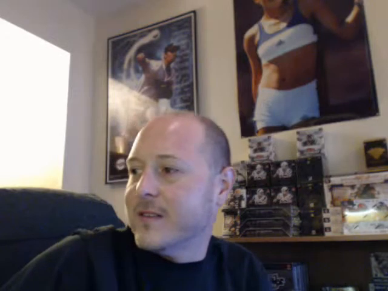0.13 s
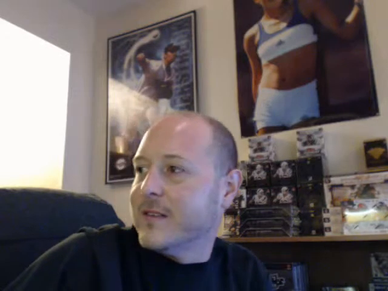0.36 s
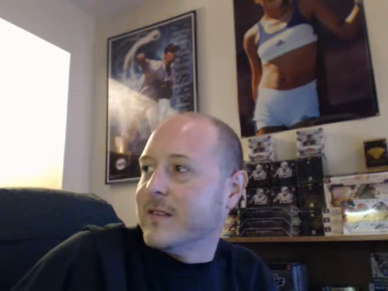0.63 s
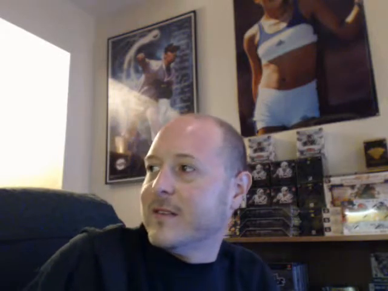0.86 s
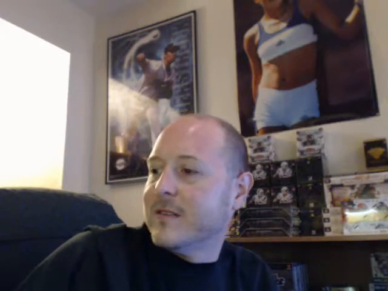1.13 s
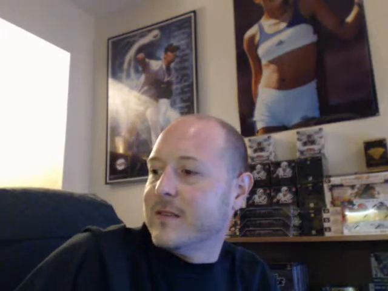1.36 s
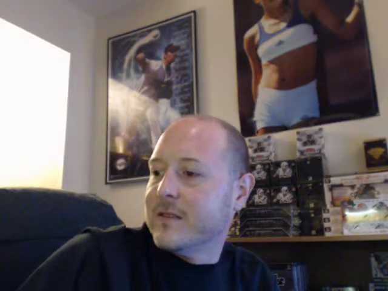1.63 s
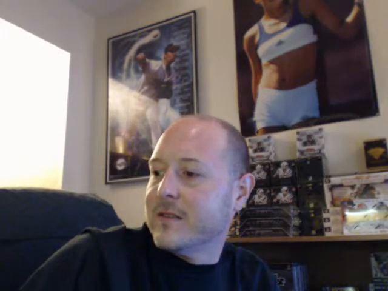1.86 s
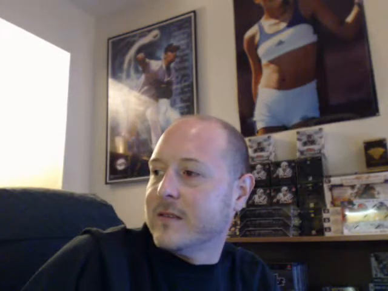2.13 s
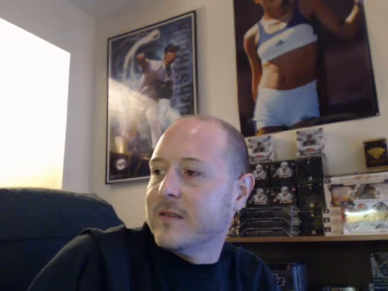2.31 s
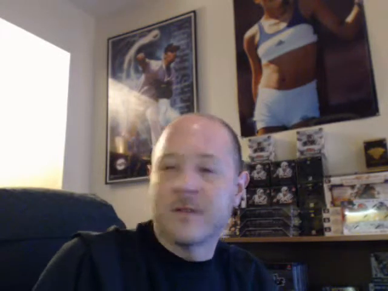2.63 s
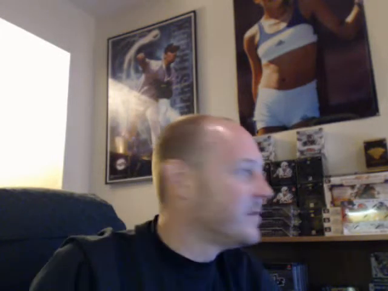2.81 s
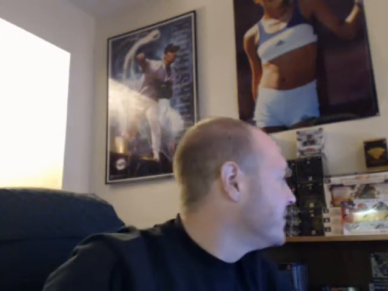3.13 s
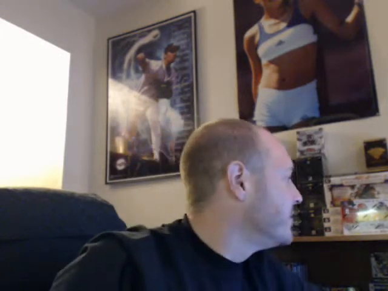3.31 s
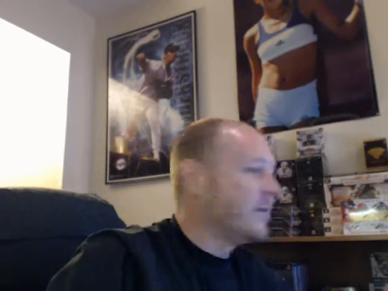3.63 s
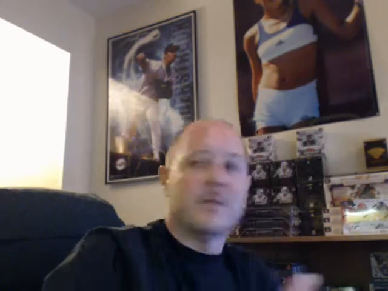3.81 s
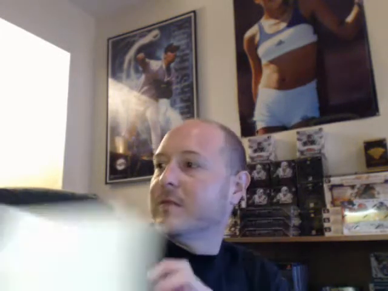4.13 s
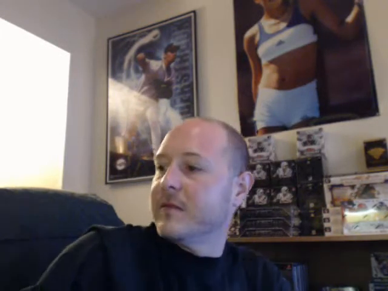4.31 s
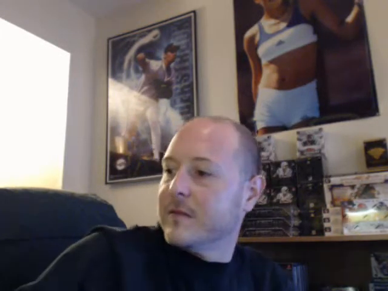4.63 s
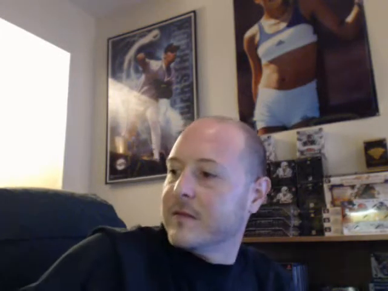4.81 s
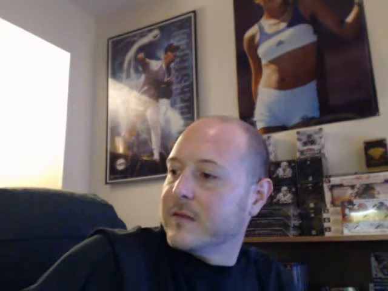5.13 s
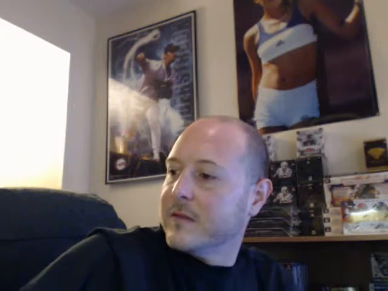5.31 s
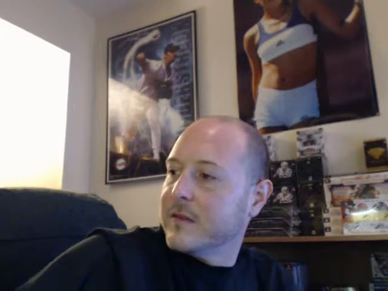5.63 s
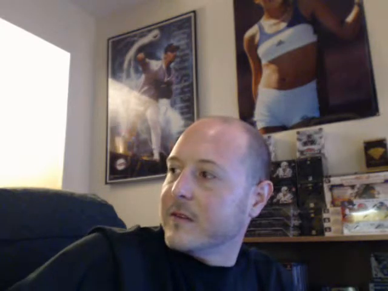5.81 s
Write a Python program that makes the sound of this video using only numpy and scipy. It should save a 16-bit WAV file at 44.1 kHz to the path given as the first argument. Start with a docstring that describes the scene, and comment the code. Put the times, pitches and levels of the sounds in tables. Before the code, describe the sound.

A small, fairly dry indoor room has a quiet low rumble, faint hiss and a barely audible thin fan tone. From 0 to about 2.1 s, a sheet of paper is pushed in eight very short rasping strokes, roughly every 0.3 s, each with a gripping squeak and a small snap; light desk taps fall between them. At 2.3 s the strokes merge into a longer scratchy slide lasting until about 2.8 s. A lull follows, with a soft bump or so. Around 3.35 s the paper is picked up with a click, rustle and swish; it flexes most loudly from 3.8 to 4.25 s, crackling, with a low papery boom near 4.0. Finer slips through the fingers follow at 4.4-4.7 s. A sharp, strong click with a low thump comes at 4.85 s, then light taps near 5.3, 5.5 and 5.85 s. A webcam microphone dulls the top and the deep bass.

```python
"""A sheet of paper is pushed along a desk in eight short strokes and one long slide, as by a paper feed:
frictional noise, with a squeak as each push grips and a snap as it lets go. Picked up, the sheet flexes
in crackles, scrapes and slides through the fingers as filtered slips, booms and is swung aside.
Light taps ring the desk, clicks are coloured pulses and soft low bumps are short damped swings.
A small room with a low rumble surrounds them, heard through a webcam microphone."""
import sys
import numpy as np
from scipy import signal
from scipy.fft import rfft, irfft, next_fast_len
from scipy.io import wavfile
from scipy.ndimage import uniform_filter1d, map_coordinates

SR = 44100
rng = np.random.default_rng(int(sys.argv[2]) if len(sys.argv) > 2 else 0)


def bounce(signal):
    """Save signal as a 16-bit WAV file at the path given by the first command-line argument."""
    frames = np.transpose(np.atleast_2d(signal))
    limited = np.clip(frames, -1, 1)
    pcm = np.round(limited * 32767).astype(np.int16)
    wavfile.write(sys.argv[1], SR, pcm)


N = 262703
T = np.arange(N) / SR  # time [s]
TOP_HZ = 8300  # upper limit of the microphone


def undb(db):
    """Logarithmic level: decibels to amplitude gain."""
    return 10 ** (np.asarray(db) / 20)


def unit(x):
    """Power normalisation: scale to rms 1."""
    return x / np.sqrt(np.mean(x ** 2))


def curve(hz, points):
    """Spectral envelope: join (frequency [Hz], level [dB]) points on a log-frequency axis."""
    f, db = np.transpose(points)
    return np.interp(np.log(hz), np.log(f), db)


def colour(x, response):
    """Minimum-phase filtering: a causal filter whose gain in dB is response(Hz)."""
    size = 2 * next_fast_len(len(x))
    hz = np.maximum(np.arange(size // 2 + 1) * SR / size, 1)
    cepstrum = irfft(np.log(undb(response(hz))))
    # folding the cepstrum onto positive time makes the filter causal
    cepstrum[1:size // 2] *= 2
    cepstrum[size // 2 + 1:] = 0
    gain = np.exp(rfft(cepstrum))
    return irfft(rfft(x, size) * gain)[:len(x)]


def below(hz, edge_hz):
    """Shelving weight: 1 well below the edge, 0 well above it."""
    return 1 / (1 + ((hz / edge_hz) ** 2) ** 2)


def resonance(offset, width):
    """Lorentzian resonance: 1 at zero offset, one half at half the width to either side."""
    return 1 / (1 + (2 * offset / width) ** 2)


def held(age, attack_s, hold_s, release_s):
    """Envelope: a straight rise, held until hold_s after the start, then an exponential fall."""
    return np.clip(age / attack_s, 0, 1) * np.exp(-np.maximum(age - hold_s, 0) / release_s)


def noise_burst(t, decay_s):
    """Impact excitation: noise with a rounded start and an exponential decay."""
    return rng.standard_normal(len(t)) * (np.exp(-t / decay_s) - np.exp(-5 * t / decay_s))


def add(out, start, x):
    """Superposition: mix x into out from a start time in seconds."""
    i = int(start * SR)
    x, i = x[max(-i, 0):], max(i, 0)
    out[i:i + len(x)] += x[:len(out) - i]


def fibres(size, rate, spread_db):
    """Stick-slip friction: random tiny slips, rate per second, of widely scattered strength."""
    slips = rng.random(size) < rate / SR
    strength_db = spread_db * np.minimum(rng.exponential(size=size), 4)
    return unit(slips * rng.standard_normal(size) * undb(strength_db))


def blow(x, db):
    """Impulse energy: scale a short sound so that its energy spread over 10 ms has the level db."""
    return x * undb(db) / np.sqrt(np.sum(x ** 2) / (SR / 100))


# pushes of the sheet: (start [s], length [s], hiss level [dB], body level relative to hiss [dB])
PUSHES = [(-.02, 0.044, -40, -8), (0.231, 0.057, -39.5, 3.5), (.524, .055, -39, 2), (.82, 0.061, -38, 1.5),
          (1.114, 0.065, -37, -2), (1.414, 0.063, -35, -7.5), (1.694, .06, -35.5, -3.5),
          (1.988, 0.061, -36.5, -2), (2.302, .17, -37, -0.5), (2.492, .28, -37.5, 1)]
# spectrum of the rubbing: (frequency [Hz], level [dB])
RUB_SPECTRUM = [(71, -29.5), (120, -26.5), (266, -14), (422, -4.5), (580, 0.5), (704, -6.5), (856, 3),
                (968, -2.5), (1060, 6.5), (1240, -5), (1770, -3), (3340, -14.5), (4510, -15.5),
                (7410, -22.5), (8240, -33.5), (10700, -78), (18100, -120)]
# resonances of the surface under the sheet: (frequency [Hz], width [Hz], height [dB])
SURFACE_MODES = [(438, 17, 6.5), (578, 35, 5.5), (713, 30, 2), (774, 99, 0.5), (970, 60, -0.5),
                 (1030, 73, 1), (1155, 360, -3.5), (1360, 16, 4.5), (1610, 28, 2.5), (1840, 7.6, 0),
                 (2272, 50, 5.5), (4700, 600, 5.5)]


def strokes(build_s=0.014, attack_s=0.004, stop_s=0.014):
    """Sliding friction: each push hisses at once and its low body joins as it gathers speed."""
    def response(hz):
        modes = sum(db * resonance(hz - f, width) for f, width, db in SURFACE_MODES)
        return curve(hz, RUB_SPECTRUM) + modes
    rub = unit(colour(fibres(N, rate=14000, spread_db=1.7), response))
    low_pass = signal.butter(2, 1300, fs=SR, output="sos")
    body = signal.sosfiltfilt(low_pass, rub)
    hiss = rub - body
    out = np.zeros(N)
    for start, length, db, body_db in PUSHES:
        age = np.maximum(T - start, 0)
        gate = held(age, attack_s, length, stop_s)
        speed = 1 - np.exp(-(age / build_s) ** 2)
        out += undb(db) * gate * (hiss + undb(body_db) * speed * body)
    return out


# spectrum of the gripping squeak: (frequency [Hz], level [dB])
GRIP_SPECTRUM = [(200, -28.5), (900, -13.5), (1070, -1), (1300, -3.5), (1900, -5), (2230, 7), (2750, -20),
                 (3500, -6.5), (4500, 1.5), (5500, -22.5), (8500, -36.5)]
GRIP_S, GRIP_DB, GRIP_BASS_DB = 0.0075, -4.5, -4.5  # decay, level relative to the push, bass shelf


def grips():
    """Static friction breaking: a brief squeak of coloured noise as each push catches the sheet."""
    def response(hz):
        return curve(hz, GRIP_SPECTRUM) + GRIP_BASS_DB * below(hz, edge_hz=1500)
    out, t = np.zeros(N), T[:SR // 10]
    for start, _, db, _ in PUSHES:
        squeak = colour(noise_burst(t, GRIP_S), response)
        add(out, start, blow(squeak, db + GRIP_DB))
    return out


# spectrum of the room rumble and hiss: (frequency [Hz], level [dB])
RUMBLE_SPECTRUM = [(18, -65.5), (30, -30), (93, 0.5), (183, 1), (345, -15.5), (540, -15.5), (651, -27.5),
                   (864, -19.5), (1200, -27), (1350, -32), (1450, -23.5), (2490, -24.5), (3000, -32),
                   (6070, -34.5), (8240, -51), (10700, -89), (18100, -120)]
RUMBLE_DB = -61


def floor(whine_hz=1360, whine_db=-83):
    """Stationary background noise: low rumble and faint hiss, with the thin pure tone of a fan."""
    air = unit(colour(rng.standard_normal(N), lambda hz: curve(hz, RUMBLE_SPECTRUM)))
    whine = unit(np.sin(2 * np.pi * whine_hz * T))
    return undb(RUMBLE_DB) * air + undb(whine_db) * whine


# lone crisp clicks: (time [s], level [dB], bass shelf [dB])
CLICKS = [(1.436, -33, -13.5), (3.371, -39, -27.5), (3.927, -38.5, 29), (4.146, -35, 3.5),
          (4.854, -24.5, -3.5), (5.2785, -60, -18), (5.503, -66, -6)]
# spectrum of a click: (frequency [Hz], level [dB])
CLICK_SPECTRUM = [(90, -13), (140, -9.5), (700, -3.5), (1400, -6), (2100, -5), (3400, -12), (4100, -2),
                  (4550, -2), (5100, -8), (5800, -24.5), (6500, -17.5), (7400, -40), (8500, -39.5)]
# snap before the end of each push: lead time [s], level relative to the push [dB], bass shelf [dB]
LET_GO_S, LET_GO_DB, LET_GO_BASS_DB = 0.011, -5.5, 1.5


def snaps(crack_s=0.0029, crack_db=-19):
    """Impulsive release: one sharp pulse with a brief crackle, alone or near the end of a push."""
    out, t = np.zeros(N), T[:SR // 10]
    releases = [(start + length - LET_GO_S, db + LET_GO_DB, LET_GO_BASS_DB)
                for start, length, db, _ in PUSHES]
    for start, db, bass_db in CLICKS + releases:
        def response(hz):
            return curve(hz, CLICK_SPECTRUM) + bass_db * below(hz, edge_hz=2100)
        crackle = undb(crack_db) * rng.standard_normal(len(t)) * np.exp(-t / crack_s)
        pulse = t == 0
        add(out, start, blow(colour(pulse + crackle, response), db))
    return out


# light taps on the desk: (time [s], level [dB], upper edge [Hz], contact time constant [s])
DESK_TAPS = [(.028, -39, 3100, 0.0076), (.189, -42, 2850, 0.012), (0.339, -45, 3350, 0.0072),
             (0.476, -32.5, 2540, 0.0071), (.615, -52.5, 1490, 0.0061), (1.324, -55.5, 1600, 0.0069),
             (1.597, -47.5, 2190, 0.013), (1.798, -40.5, 1490, 0.0027), (5.062, -56.5, 1300, 0.011),
             (5.278, -33.5, 1900, 0.0024), (5.501, -40, 1750, .005), (5.52, -41.5, 850, 0.01),
             (5.715, -53.5, 1300, 0.0094), (5.851, -40, 2640, 0.0051), (5.868, -38.5, 2900, 0.0062)]
# modes of the desk: (nominal frequency [Hz], level [dB], t60 before damping [s])
DESK_MODES = [(345, -4, .13), (455, -5, .11), (525, -1, .11), (730, -4, .08), (920, -2, .08),
              (1080, 1, .07), (1510, -5, .05), (2300, -9, .05)]
DESK_RING_DB, DESK_DAMPING = -4, 2.4  # ring relative to knock; a resting hand shortens t60 this many times
KNOCK_HZ, KNOCK_WIDTH_HZ, KNOCK_DB = 860, 360, 1.5  # hollow body of every tap


def desk_ring(t):
    """Modal decay: damped sines, each slightly detuned at random."""
    ring = np.zeros(len(t))
    for hz, db, t60 in DESK_MODES:
        detuned_hz = hz * (1 + 0.011 * rng.standard_normal())
        decay = np.exp(-np.log(1000) * DESK_DAMPING * t / t60)
        ring += undb(db) * decay * np.sin(2 * np.pi * detuned_hz * t)
    return ring


def taps(dull_db=-29, thin_db=-16, top_db=-26, tick_db=8):
    """Impact and modal response: a tick and scuff knock the desk; longer contact rounds the scuff's start."""
    out, t = np.zeros(N), T[:SR // 4]
    for start, db, edge_hz, contact in DESK_TAPS:
        def response(hz):
            hollow = KNOCK_DB * resonance(hz - KNOCK_HZ, KNOCK_WIDTH_HZ)
            dull = dull_db * (1 - below(hz, edge_hz))
            thin = thin_db * below(hz, edge_hz=350)
            return hollow + dull + thin + top_db * (hz / TOP_HZ).clip(0, 2)
        push = undb(tick_db) * (t == 0) + noise_burst(t, contact)
        knock = blow(colour(push, response), 0)
        desk = blow(signal.fftconvolve(knock, desk_ring(t))[:len(t)], DESK_RING_DB)
        add(out, start, blow(knock + desk, db))
    return out


# the clearest soft low bumps: (time [s], level [dB])
CLEAR_BUMPS = [(0.35, -45.5), (0.669, -49), (.917, -44), (1.025, -49), (1.525, -45), (2.063, -46),
               (3.144, -43.5), (3.343, -46), (3.56, -40), (3.603, -40), (3.937, -41.5), (3.999, -37),
               (4.31, -48), (4.344, -49), (4.848, -36), (5.015, -42), (5.192, -51), (5.279, -44.5),
               (5.675, -48)]
BUMP_HZ, BUMP_S = 124.8, 0.021  # mean main frequency; twice the time to the peak
# fainter bumps come at random while the sheet is in the hand, from begin [s] to end [s]
HANDLING_S, FIDGETS_PER_S, FIDGET_DB, FIDGET_SPREAD_DB = (3.4, 5.1), 7.1, -51, 1


def bumps():
    """Damped oscillation: soft contacts move the furniture for a few slow cycles; handling adds more."""
    out, t = np.zeros(N), T[:SR // 4]
    age = t / (BUMP_S / 2)
    envelope = (age * np.exp(1 - age)) ** 2
    begin, end = HANDLING_S
    fidgets = [(begin + (k + rng.random()) / FIDGETS_PER_S, FIDGET_DB + FIDGET_SPREAD_DB * rng.standard_normal())
               for k in range(int((end - begin) * FIDGETS_PER_S))]
    for start, db in CLEAR_BUMPS + fidgets:
        chance = rng.standard_normal(3)
        hz = BUMP_HZ * (1 + 0.11 * chance[0])
        swing = np.sin(2 * np.pi * hz * t)
        swing += 0.49 * np.sin(2 * np.pi * 172 * t + chance[1])
        swing += 0.13 * np.sin(2 * np.pi * 104 * t + chance[2])
        add(out, start, undb(db) * unit(swing) * envelope)
    return out


# swipes of paper through the fingers: (start [s], length [s], starting level [dB], swell or fade [dB/s])
FINGER_SWIPES = [(1.189, 0.1, -62.5, -64), (3.336, .125, -51.5, -76), (3.474, .28, -54.5, -14),
                 (3.774, 0.23, -60, 37), (4.059, 0.044, -70, 82), (4.102, 0.11, -53.5, -31),
                 (4.448, 0.097, -49, -85), (4.552, .24, -48.5, -89), (5.032, 0.23, -81.5, 41),
                 (5.334, 0.027, -61.5, -25), (5.61, .07, -77, 9)]
# spectrum of the fine hiss: (frequency [Hz], level [dB])
HISS_SPECTRUM = [(600, 1), (1800, 0.5), (3000, -9), (4500, 11.5), (5500, 7), (6500, 8), (7500, -1),
                 (8500, -16)]
SWIPE_ATTACK_S, SWIPE_RELEASE_S = 0.014, 0.0044


def slide():
    """Speed-dependent friction: paper hisses over skin and paper as each swipe speeds up or slows down."""
    speed, t = np.zeros(N), T[:SR // 2]
    for start, length, db, db_per_s in FINGER_SWIPES:
        swell = undb(db + db_per_s * np.minimum(t, length))
        add(speed, start, swell * held(t, SWIPE_ATTACK_S, length, SWIPE_RELEASE_S))
    hiss = unit(colour(fibres(N, rate=3200, spread_db=1.0), lambda hz: curve(hz, HISS_SPECTRUM)))
    return speed * hiss


# scrapes of an edge between bends: (start [s], length [s], level [dB], resonance at mid-scrape [Hz])
EDGE_SCRAPES = [(3.344, 0.059, -51, 1300), (3.385, 0.081, -47, 2080), (3.518, 0.062, -56.5, 1230),
                (3.604, 0.062, -54.5, 2150), (3.883, 0.072, -41, 1660), (4.159, 0.045, -47, 2060),
                (4.241, 0.02, -48.5, 1940), (4.257, 0.028, -53.5, 880), (4.44, 0.062, -51.5, 2340),
                (4.623, 0.061, -59, 1520), (5.337, 0.0496, -60, 2830), (5.851, .028, -55, 2440)]
# spectrum of the sheet in the hand, scraping or bending: (frequency [Hz], level [dB])
SHEET_SPECTRUM = [(100, -11), (260, -22.5), (450, -1), (900, 4), (1600, -2), (2500, -3), (4000, -6.5),
                  (6500, -23), (7500, -21.5), (8500, -39)]
SCRAPE_ATTACK_S, SCRAPE_RELEASE_S, SCRAPE_GLIDE_PER_S = 0.0068, 0.0088, -0.8
SCRAPE_NASAL_DB, SCRAPE_WIDTH = 11, 0.22  # height; width as a fraction of the resonance frequency


def scrapes(bass_db=-6, treble_db=-7):
    """Stick-slip with a resonance: an edge drags in coarse slips, gliding down as the bend eases."""
    out, t = np.zeros(N), T[:SR // 4]
    for start, length, db, centre_hz in EDGE_SCRAPES:
        def response(hz):
            nasal = SCRAPE_NASAL_DB * resonance(hz / centre_hz - 1, SCRAPE_WIDTH)
            shelves = bass_db * below(hz, edge_hz=230) + treble_db * (1 - below(hz, edge_hz=4400))
            return curve(hz, SHEET_SPECTRUM) + nasal + shelves
        slips = unit(colour(fibres(len(t), rate=1900, spread_db=-1.0), response))
        # reading the noise ever more slowly lowers its pitch
        pace = np.exp(SCRAPE_GLIDE_PER_S * (t - length / 2))
        slips = map_coordinates(slips, [np.cumsum(pace)], order=3)
        add(out, start, undb(db) * held(t, SCRAPE_ATTACK_S, length, SCRAPE_RELEASE_S) * slips)
    return out


# bends of the sheet: (start [s], rise [s], hold [s], level [dB], bass shelf [dB], treble shelf [dB])
BENDS = [(3.345, 0.032, 0.0075, -40.5, -4, 2), (3.571, .007, 0.01, -37, 0, -5.5),
         (3.724, 0.0055, .008, -50.5, -25, -4), (3.787, 0.011, 0.037, -49.5, 7.5, 19),
         (3.832, .012, 0.043, -33, -7, -37), (3.921, 0.0056, 0.0176, -31, -5.5, -8.5),
         (3.964, 0.021, 0.015, -30, 2, -9.5), (4.133, 0.012, .005, -29, -4, -2),
         (4.235, 0.0058, 0.0128, -41.5, -8, -19), (4.437, .028, 0.0228, -46, 4.5, 17),
         (4.557, 0.0098, .016, -46.5, 0.5, -6), (5.344, 0.027, 0.01, -57.5, -3, 8)]
FLEX_RING_HZ, FLEX_RING_SCATTER = 1660, 0.13  # median resonance; random spread of its natural log


def flexes(settle_s=0.0079, sag=0.12, ring_db=5, ring_width=0.6):
    """Elastic release: the bending sheet lets go a swell of crackles; its resonance sinks as it relaxes."""
    out, t = np.zeros(N), T[:SR // 4]
    for start, rise, hold, db, bass_db, treble_db in BENDS:
        ring_hz = FLEX_RING_HZ * np.exp(FLEX_RING_SCATTER * rng.standard_normal())

        def response(hz):
            ring = ring_db * resonance(hz / ring_hz - 1, ring_width)
            shelves = bass_db * below(hz, edge_hz=1110) + treble_db * (1 - below(hz, edge_hz=3800))
            return curve(hz, SHEET_SPECTRUM) + ring + shelves
        crackle = unit(colour(fibres(len(t), rate=3500, spread_db=-1.0), response))
        tension = np.exp(-np.maximum(t - rise - hold, 0) / settle_s)
        pace = 1 - sag * (1 - tension)
        crackle = map_coordinates(crackle, [np.cumsum(pace)], order=3)
        add(out, start, undb(db) * np.minimum(t / rise, 1) ** 1.47 * tension * crackle)
    return out


# booms of the whole sheet after the hardest flicks: (time [s], level [dB])
SHEET_BOOMS = [(3.986, -30.5), (4.143, -43), (4.854, -38)]
BOOM_HZ, BOOM_T60_S = 339, 0.11


def booms(rise_s=0.005):
    """Single-mode vibration: one low mode of the sheet swings briefly after a hard flick."""
    out, t = np.zeros(N), T[:SR // 4]
    swing = held(t, rise_s, rise_s, BOOM_T60_S / np.log(1000)) * np.sin(2 * np.pi * BOOM_HZ * t)
    for start, db in SHEET_BOOMS:
        add(out, start, undb(db) * swing)
    return out


def sweep(x, lag_s=0.0006, wander=0.55, rate_hz=8, echo=0.35):
    """Comb-filter interference: the moving sheet reflects its own sound over a randomly changing path."""
    places = rng.uniform(-0.98, 1, size=200)
    path = np.interp(T * rate_hz, np.arange(len(places)), places)
    lag = lag_s * np.exp(wander * path)
    reflected = map_coordinates(x, [(T - lag) * SR], order=3)
    return (x + echo * reflected) / np.sqrt(1 + echo ** 2)


ROOM_T60_S, ROOM_DB = 0.14, -8.5  # decay time; reverberant level relative to direct sound


def room(x):
    """Reverberation: close walls answer within milliseconds in an exponentially dying noise tail."""
    t = T[:SR // 3]
    tail = rng.standard_normal(len(t)) * undb(-60 * t / ROOM_T60_S) * (t > 0.0025)
    tail *= undb(ROOM_DB) / np.sqrt(np.sum(tail ** 2))
    return (x + signal.fftconvolve(x, tail)[:N]) / np.sqrt(1 + undb(ROOM_DB) ** 2)


def scene():
    """Superposition of paper and desk sounds; the booms, bumps and background bypass the reverberation."""
    pushed = sweep(strokes(), lag_s=0.000693, wander=1.2, rate_hz=14) + grips()
    in_hand = sweep(flexes() + scrapes() + slide())
    reverberant = room(pushed + in_hand + snaps() + taps())
    return (reverberant + booms() + bumps() + floor())[None]


def record(dry, gate_db=-76, depth_db=-5):
    """Band limiting and downward expansion: the webcam drops deep bass, faint treble and the top octave."""
    high_pass = signal.butter(3, 75, "high", fs=SR, output="sos")
    thin = signal.sosfilt(high_pass, dry)
    treble_pass = signal.butter(2, 3000, "high", fs=SR, output="sos")
    treble = signal.sosfiltfilt(treble_pass, thin)
    power = uniform_filter1d(treble ** 2, int(0.012 * SR))
    faint = 1 / (1 + power / undb(gate_db) ** 2)  # near 1 where the treble is weak
    quieted = thin - treble * (1 - undb(depth_db * faint))
    low_pass = signal.ellip(8, 0.2, 70, TOP_HZ, fs=SR, output="sos")
    return signal.sosfilt(low_pass, quieted)


dry = scene()
out = record(dry)
bounce(out)
```